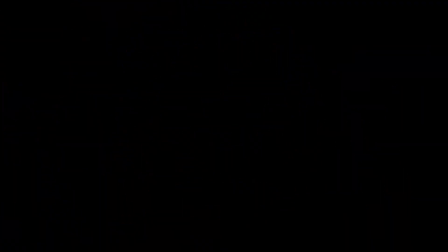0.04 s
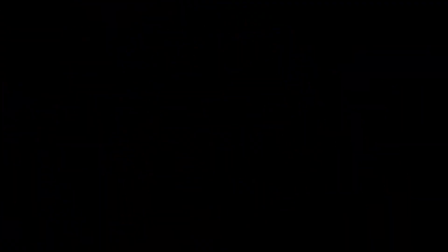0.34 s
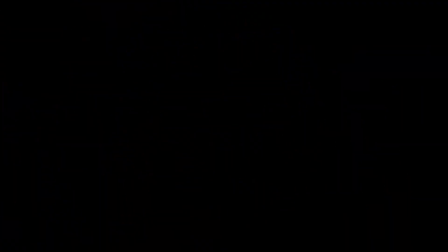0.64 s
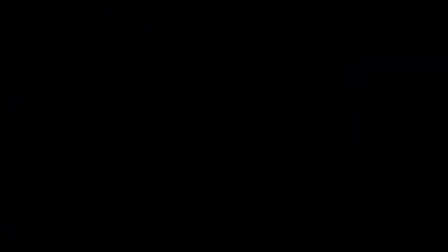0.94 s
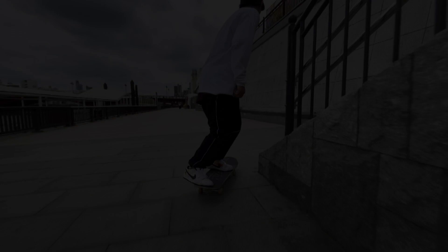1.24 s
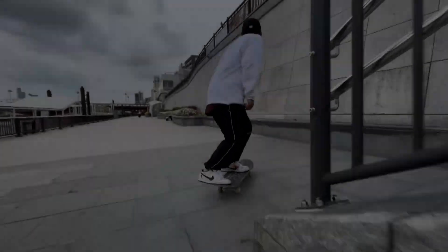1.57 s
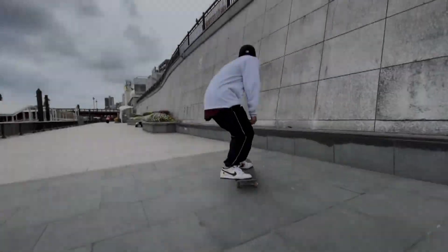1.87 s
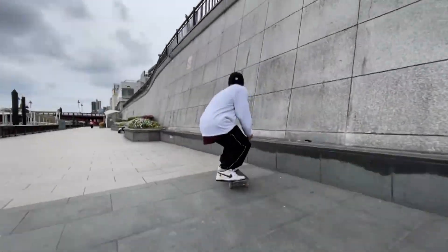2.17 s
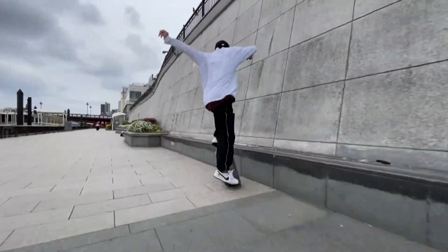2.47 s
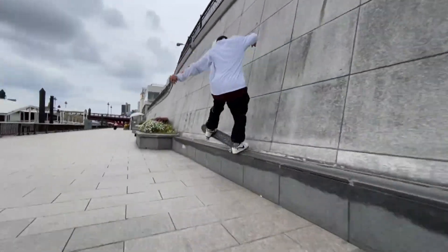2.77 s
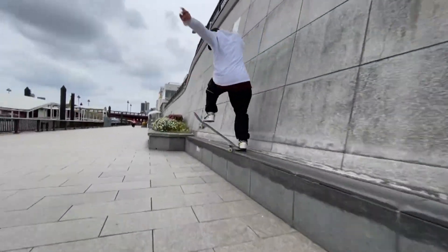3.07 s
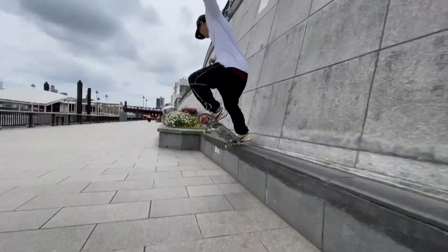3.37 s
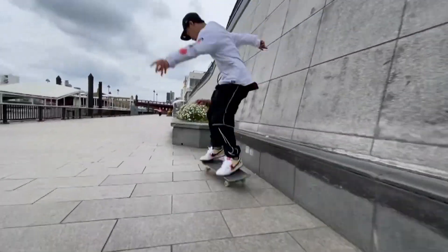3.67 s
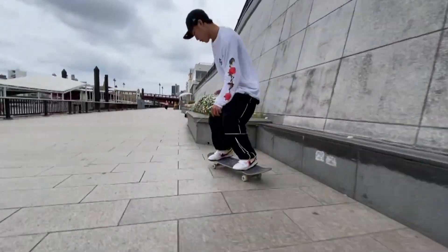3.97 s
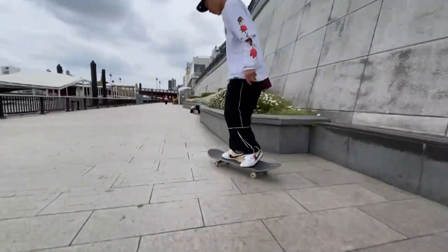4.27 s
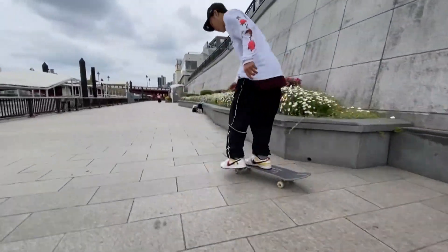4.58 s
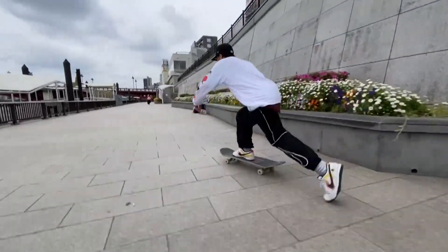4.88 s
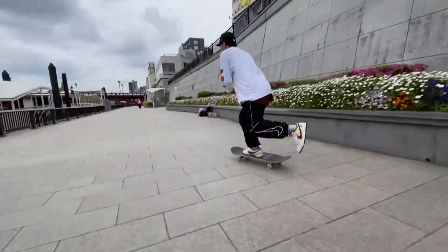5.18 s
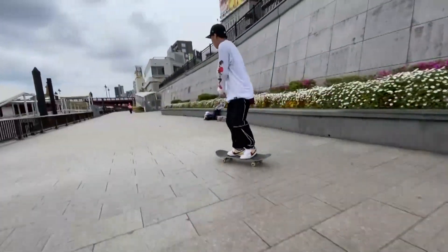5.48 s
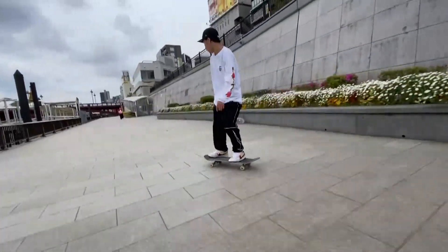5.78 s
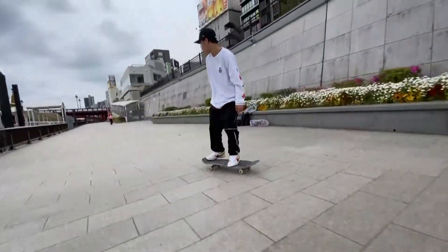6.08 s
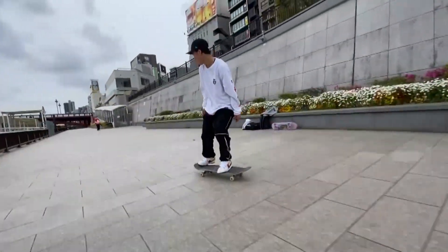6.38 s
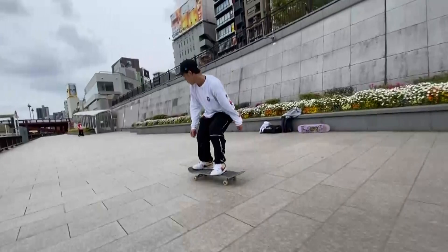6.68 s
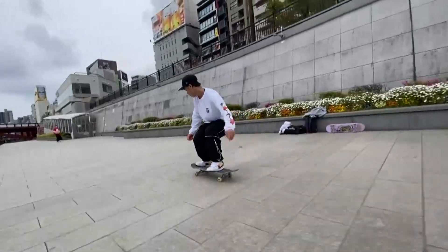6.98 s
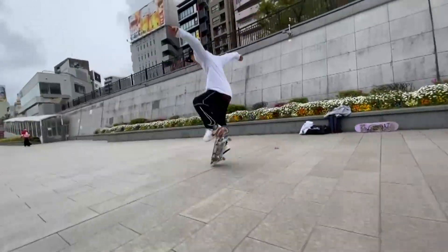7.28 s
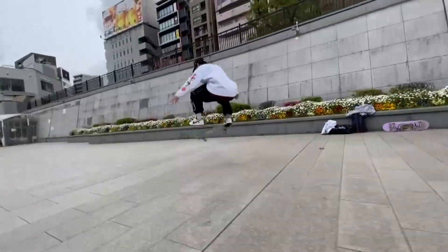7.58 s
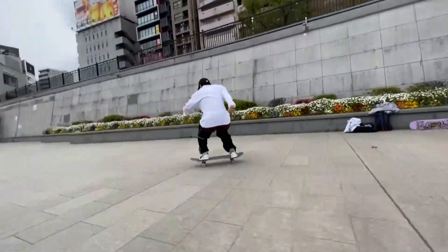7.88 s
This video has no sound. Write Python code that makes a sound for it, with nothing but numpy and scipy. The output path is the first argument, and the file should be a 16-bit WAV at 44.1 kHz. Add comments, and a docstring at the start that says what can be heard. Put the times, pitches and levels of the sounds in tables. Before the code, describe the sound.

Hard skateboard wheels roar over stone paving; a board pops onto a ledge, scrapes along it, lands, then snaps through a flip trick.

```python
"""A roar of hard wheels on gritty stone paving fades in from silence, with knocks at the slab joints.
Two skateboards roll beside a high wall, one right under the microphone, one just ahead. The rider
ahead pops onto a stone ledge, scrapes along it, lands, pushes off, then pops and lands a flip trick.
Blows ring the wooden decks and metal trucks; paving and wall reflect; a gust buffets the microphone."""
import sys
import numpy as np
from scipy import signal
from scipy.fft import rfft, irfft, next_fast_len
from scipy.io import wavfile
from scipy.ndimage import uniform_filter1d

SR = 44100
rng = np.random.default_rng(int(sys.argv[2]) if len(sys.argv) > 2 else 0)


def transcribe(signal):
    """Save signal, clipped to [-1, 1], as a 16-bit WAV file at the path in sys.argv[1]."""
    frames = np.atleast_2d(signal).T
    limited = np.clip(frames, -1, 1)
    pcm = np.round(limited * 32767).astype(np.int16)
    wavfile.write(sys.argv[1], SR, pcm)


N = 354123
TIME = np.arange(N) / SR
HIT_TIME = TIME[:8192]
FADE_START_S = 0.725

# wheel hiss spectrum: freq_hz, level_db
HISS_SPECTRUM = [(1500, -18), (3200, -1), (5000, 6.5), (7000, -2), (10000, 3.5), (15000, -12.5)]
# spectrum of a wheel on a slab edge: freq_hz, level_db
TICK_SPECTRUM = [(500, -36), (1300, -12), (2200, -8), (3000, 3), (4500, 3.5), (6500, -5.5), (10000, -15),
                 (15000, -73)]


def rolling(jolt_db=1.62, jolt_hz=24.5):
    """Stone texture and grit shake wheels and deck; the same bumps sound in every register."""
    # register spectra: freq_hz, level_db
    rumble_spectrum = [(20, -6), (45, -8), (70, -9), (110, -11), (150, 2), (205, -1), (280, 2), (380, 1),
                       (520, -20), (900, -37.5)]
    roar_spectrum = [(250, -15), (380, -4.5), (500, 0.5), (620, 0), (780, -1), (950, -2.5), (1300, -20.5),
                     (2000, -37.5), (5000, -48)]
    clatter_spectrum = [(500, -28), (800, 1.5), (1020, 3), (1200, 0.5), (1450, 0), (1650, -5.5),
                        (2000, -12), (3000, -24), (6000, -62.5)]
    grit_spectrum = [(900, -30), (1400, -5), (1700, 6.5), (2000, 0), (2300, -4.5), (2700, -11),
                     (3500, -15.5), (4800, -13), (8000, -23)]
    # wheel howl, shifting with the stone: time_s, pitch_hz, over_roar_db
    howl_curve = [(2.2, 660, -12), (2.7, 538, -9), (3.45, 534, -6), (4.05, 534, -6.5), (4.25, 693, -1),
                  (5.0, 700, -2), (5.8, 760, -5.5), (6.25, 670, -5), (6.48, 577, -3), (6.66, 587, 4.5),
                  (6.8, 574, 2.5), (6.97, 680, 2), (7.3, 680, 1.5)]
    time_s, howl_hz, howl_db = np.transpose(howl_curve)
    bumps = grains(per_s=700, spread_db=5)
    sand = grains(per_s=250, spread_db=-1)   # crushed under the wheels
    texture = rng.standard_normal((5, N))
    rumble = rms_one(colour(texture[0] + 0.48 * bumps, rumble_spectrum))
    roar = rms_one(colour(texture[1] + 0.49 * bumps, roar_spectrum))
    howl_drive = colour(rng.standard_normal(N), roar_spectrum)
    howl = rms_one(resonance(howl_drive, np.interp(TIME, time_s, howl_hz), width_hz=63))
    howl *= from_db(np.interp(TIME, time_s, howl_db))
    deck_drive = rng.standard_normal(N)
    hollow_mode = deck_ring(centre_hz=528, focus_db=12, damping=1.2, vary_db=1.5)
    hollow = rms_one(signal.fftconvolve(deck_drive, hollow_mode)[:N])
    clatter = rms_one(colour(texture[2] + 0.83 * bumps, clatter_spectrum))
    grit = rms_one(colour(texture[3] + 0.91 * bumps + 1.27 * sand, grit_spectrum))
    hiss = rms_one(colour(texture[4] + 1.77 * puffs(bumps, decay_s=0.0018), HISS_SPECTRUM))
    wheels = (from_db(-0.5) * wheel_gain("rumble") * rumble
              + from_db(1) * wheel_gain("roar") * (roar + howl + from_db(-7) * hollow)
              + from_db(1.5) * wheel_gain("clatter") * clatter
              + wheel_gain("grit") * grit)
    jolts = from_db(jolt_db * wander(jolt_hz))   # uneven stone
    return jolts * wheels + from_db(5.5) * hiss_gain() * hiss


def wheel_gain(register, usual_roll_db=-30):
    """Gain of one rolling register, set by speed, load and coarseness of the paving."""
    # roll strength from speed and load: time_s, level_db
    roll_curve = [(1.0, -30), (1.95, -28), (2.25, -26.5), (2.74, -29), (2.88, -30), (3.15, -30.5),
                  (3.47, -27), (3.7, -27.5), (3.87, -35), (4, -30), (4.13, -28.5), (4.35, -37),
                  (4.62, -39.5), (4.79, -33), (4.96, -24.5), (5.07, -30), (5.55, -33), (5.88, -25),
                  (6.23, -27.5), (6.58, -26.5), (7.55, -31), (7.75, -28), (7.87, -37), (8.03, -33)]
    # paving coarseness: time_s, over_ordinary_db
    coarseness_curve = [(1.4, 2), (2.1, -4.5), (2.45, 1), (2.7, -3.5), (3.42, 4), (3.8, 3.5), (4.15, -3),
                        (4.4, -3.5), (4.6, -2), (4.88, 8), (5.1, 1), (5.5, 0.5), (5.75, 9.5), (6.049, 0.5),
                        (6.45, 1.5), (6.95, 1.5), (7.55, 4), (8, 0.5)]
    # response by register: usual_db, db_per_roll_db, db_per_coarse_db
    responses = {"roar": (-30.5, 0.99, -0.017), "rumble": (-36, 0.66, -0.19),
                 "clatter": (-33.5, 0.76, 0.61), "grit": (-42, 0.84, 0.92), "hiss": (-53, 0.46, 0.23)}
    usual_db, per_roll, per_coarse = responses[register]
    roll_db = np.interp(TIME, *np.transpose(roll_curve))
    coarse_db = np.interp(TIME, *np.transpose(coarseness_curve))
    return from_db(usual_db + per_roll * (roll_db - usual_roll_db) + per_coarse * coarse_db)


def hiss_gain():
    """Rolling hiss and scuffs, summed in power."""
    # wheels and soles scuffing sideways: centre_s, sigma_s, level_db
    scuffs = [(2.44, 0.027, -46), (4.2, 0.064, -51.5), (4.84, 0.18, -47), (5.4, 0.15, -51.5),
              (5.83, 0.05, -51), (7.1, 1, -50.5)]
    return np.hypot(wheel_gain("hiss"), swells(scuffs))


def joints(small_per_s=9):
    """Woody knocks, mostly wheels on slab joints; lesser ones at uneven steps scale with the roar."""
    # loudest woody knocks (slab joints, loose trucks, the pop and the ledge hit):
    # start_s, thud_hz, thud_db, clack_db, snap_db, tick_db
    knocks = [(0.7558, 640, -8, -13, -35, -32), (0.8768, 620, -6, -12, -36.5, -28),
              (1.0028, 750, -27, -18, -24, -42.0), (1.022, 690, -16, -13, -36, -41),
              (1.0537, 640, -22, -13, -24, -46), (1.1583, 700, -14, -5, -35, -21),
              (1.1656, 740, -24, -11, -33, -22.5), (1.2824, 770, -11, -11, -28, -31),
              (1.2898, 660, -21, -9.5, -32, -36), (1.3827, 660, -27.5, -19, -26, -31),
              (1.4055, 650, -14, -16, -38, -44), (1.4163, 640, -15, -15, -39, -33),
              (1.493, 543, -14, -28, -19.5, -26.5), (1.538, 650, -15.5, -11, -23, -25),
              (1.6684, 604, -9, -5.5, -35, -40), (1.6757, 680, -14, -25, -35, -27.5),
              (1.799, 676, -17, -20, -44, -35), (1.8125, 610, -11, -15, -38, -29),
              (1.9367, 610, -15.5, -13, -44, -36), (2.0694, 724, -8.5, -17, -38, -48),
              (2.0783, 680, -13, -14, -41.5, -43), (2.1002, 664, -15, -10, -37, -29.0),
              (2.2141, 600, -10.5, -10, -40, -47.5), (2.228, 710, -10, -8, -34, -24.5),
              (2.2367, 552, -20, -12, -39, -39.0), (2.2532, 775, -5, -15, -26, -28),
              (2.261, 636, -10.5, -30, -42.0, -47.5), (2.366, 945, -6.5, -8, -32, -25),
              (2.3715, 1000, -8, -14, -38, -33), (2.385, 800, -4, -9, -29, -21.5),
              (2.3918, 640, -12, -22, -39.5, -41), (2.524, 795, -13.5, -26, -43.5, -55.0),
              (2.5655, 560, -17, -10, -14, -15), (2.7543, 620, -14, -16, -34, -36),
              (2.7603, 567, -10.5, -27, -46.0, -47), (2.805, 580, -31, -35, -23, -9.5),
              (2.9163, 606, -18, -19.0, -50.0, -54.0), (3.0635, 546, -15, -20, -44, -42),
              (3.075, 530, -14.5, -23, -42, -46), (3.2923, 640, -12.5, -23, -28, -38),
              (3.3709, 716, -5.5, -17, -25, -37), (3.3774, 566, -9.0, -13, -23, -39),
              (3.4165, 800, -23.5, -19, -25, -33), (3.4316, 560, -9, -13, -20, -31),
              (3.4817, 510, -10, -30, -40.0, -43.0), (3.487, 583, -8, -20, -30, -29),
              (3.5333, 600, -13.5, -21, -36.5, -39), (3.5835, 760, -8, -20, -37, -46),
              (3.5894, 573, -2.5, -4.5, -12, -20.5), (3.5971, 574, -8.5, -5, -29, -46),
              (3.6357, 780, -4.5, -12, -35.5, -27), (3.6807, 596, -10, -25, -50.5, -48.5),
              (3.795, 770, -13.5, -15, -39.5, -43.5), (3.935, 554, -15, -21, -34, -30),
              (3.847, 560, -16, -28, -44, -50), (4.0195, 545, -22, -26, -44, -40),
              (4.0924, 650, -11.5, -15.5, -34, -34), (4.1201, 661, -21, -26, -42, -48),
              (4.176, 630, -18, -22, -40, -37), (4.2142, 640, -18, -24, -34, -34),
              (4.675, 760, -21, -40, -44, -52), (4.8775, 820, -27, -20, -22, -38),
              (4.9844, 700, -16, -23, -29.5, -30), (5.302, 700, -15, -23, -42, -44),
              (5.507, 700, -26, -27, -38, -46), (5.5896, 704, -18, -21, -37, -41),
              (5.616, 720, -16, -21, -32, -39), (5.6383, 696, -21, -12.5, -38, -29),
              (5.6736, 710, -26, -16, -32.5, -34), (5.708, 654, -12.5, -13, -19, -24.5),
              (5.7536, 705, -14, -13, -37.0, -43.0), (5.761, 840, -25, -14, -23, -31.5),
              (5.786, 700, -24, -16, -29, -40), (5.827, 695, -19, -28, -26, -43),
              (5.899, 710, -10, -13, -19, -40.5), (5.9177, 620, -12, -26, -37, -42),
              (5.936, 690, -25, -12, -15, -29), (5.9959, 710, -14.5, -13, -14, -24.5),
              (6.038, 724, -11, -26, -32, -38), (6.0585, 784, -20, -21.0, -27, -43),
              (6.133, 700, -14, -21, -40, -48), (6.173, 704, -18, -18, -33, -46),
              (6.211, 810, -11, -10, -39, -43.5), (6.2966, 760, -12.5, -19, -25, -32),
              (6.314, 715, -14, -17, -23, -37), (6.3294, 700, -16.5, -18, -24, -39),
              (6.359, 690, -13, -17, -30, -35), (6.4056, 640, -13.5, -20, -24, -44.5),
              (6.4134, 700, -22, -19, -24, -43), (6.428, 700, -13, -22, -25, -36),
              (6.4467, 590, -14, -11.5, -24, -26), (6.502, 570, -10.5, -12, -32, -32),
              (6.5415, 820, -9.5, -25, -19, -26), (6.6272, 530, -11.5, -31, -36, -26),
              (6.6454, 576, -20, -17, -32, -37.5), (6.6593, 610, -8.5, -10, -17, -24.5),
              (6.7298, 634, -22, -19, -27, -30), (6.752, 660, -13, -22, -34, -35),
              (6.761, 770, -27, -21, -20, -41), (6.794, 670, -16, -15, -22, -29),
              (6.8071, 690, -19, -11.5, -29, -24.5), (6.8379, 614, -16, -28, -27, -38),
              (6.8764, 570, -30, -21, -35, -31), (6.9166, 696, -16, -23, -34.0, -42.5),
              (7.0742, 660, -11.5, -26, -42, -47), (7.1055, 700, -31, -20, -30, -39),
              (7.119, 710, -22, -19, -33, -37), (7.1645, 730, -11, -23, -32, -33),
              (7.2399, 670, -19, -22, -36.5, -35), (7.3141, 570, -13, -17, -15, -27),
              (7.3562, 580, -18, -16, -41, -42), (7.4183, 704, -20, -16.5, -29, -47),
              (7.4597, 698, -19.5, -17.5, -41, -27), (7.4903, 666, -15.5, -24, -31, -37),
              (7.5318, 670, -6.5, -28, -34, -42), (7.6035, 716, -12, -12, -26, -27),
              (7.638, 695, -14, -12, -27, -40), (7.677, 690, -10, -14, -31.5, -26),
              (7.6894, 554, -16, -17, -33.0, -26), (7.7128, 720, -10, -23.0, -28.5, -39),
              (7.7519, 680, -15, -10.5, -29, -23), (7.861, 646, -16, -22, -42, -46),
              (7.897, 664, -18, -17, -38, -34), (7.973, 600, -13, -23, -41, -27.5),
              (8.0043, 670, -14, -14, -37, -35)]
    out, roar_gain = np.zeros(N), wheel_gain("roar")
    for start_s, *knock in knocks:
        add(out, start_s, joint_knock(*knock))
    step_s = 1 / small_per_s
    for slot_s in np.arange(FADE_START_S, TIME[-1] - step_s, step_s):
        start_s = slot_s + rng.random() * step_s
        gain = roar_gain[int(start_s * SR)] * from_db(rng.normal(0, 0.5))
        knock = joint_knock(rng.uniform(515, 980), thud_db=5.5, clack_db=0, snap_db=-24, tick_db=-17)
        add(out, start_s, gain * knock)
    return out


def joint_knock(thud_hz, thud_db, clack_db, snap_db, tick_db):
    """One touch: slab edge ticks, truck snaps, deck clacks, wheel thuds; the second wheel follows."""
    force = contact()
    thud = peak_one(butter(force, [thud_hz / 1.371, thud_hz * 1.371], "band", order=3))
    ring = peak_one(deck_ring(thud_hz, focus_db=8.5, damping=0.86, vary_db=4.5))
    clack = peak_one(butter(force, (1028, 1616), "band", order=3))
    snap = peak_one(butter(force, (1900, 2790), "band", order=3))
    tick = peak_one(colour(burst(decay_s=0.0027) * (1 - np.exp(-HIT_TIME / 0.0014)), TICK_SPECTRUM))
    knock = (from_db(thud_db) * (thud + from_db(-7.5) * ring) + from_db(clack_db) * clack
             + from_db(snap_db) * snap + from_db(tick_db + 2.5) * tick)
    lag_s = rng.uniform(0.00399, 0.009)
    second_wheel = np.pad(knock, (int(lag_s * SR), 0))[:len(knock)]
    return knock + from_db(-9.5) * second_wheel


def contact(decay_s=0.0006):
    """Force of one hard, gritty touch."""
    return burst(decay_s) * HIT_TIME + 1e-18


def slaps(attack_s=0.00057):
    """Wood meets stone: a dense crack or hissy scuff, a woody bark, the ring of deck and trucks."""
    # pops, landings, sharp clicks and hissy scuffs of the board on stone:
    # start_s, level_db, decay_s, wood_hz, highpass_hz, lowpass_hz
    touches = [(2.564, -11, 0.0052, 2620, 200, 6300), (2.58, -23.5, 0.026, 4500, 900, 7200),
               (2.609, -39, 0.0073, 6900, 4000, 9000), (2.8034, -18.5, 0.01, 2880, 150, 7650),
               (2.834, -21.5, 0.013, 3470, 300, 7000), (2.964, -23, 0.0051, 3420, 200, 8000),
               (3.191, -27, 0.057, 4100, 1500, 5530), (3.258, -27, 0.0027, 2980, 600, 9000),
               (3.3685, -31, 0.003, 4200, 1500, 7000), (3.4325, -24, 0.0021, 2970, 900, 7000),
               (4.089, -32, 0.0049, 6840, 4000, 12000), (3.7391, -10.5, 0.0065, 1510, 200, 10000),
               (3.748, -9.5, 0.0084, 1140, 200, 3220), (7.3123, -18, 0.005, 2150, 900, 5250),
               (7.7623, -18.5, 0.01, 1520, 600, 4550), (7.7692, -13.5, 0.0077, 1960, 550, 10700)]
    # contact noise spectrum: freq_hz, level_db
    slap_spectrum = [(60, -21), (170, -1), (300, 10), (500, 3.5), (800, 0.5), (1500, 1), (2700, -9.5),
                     (3500, -8), (4600, -5.5), (6500, -14), (10000, -9.5), (16000, -2)]
    out, attack = np.zeros(N), 1 - np.exp(-HIT_TIME / attack_s)
    for start_s, level_db, decay_s, wood_hz, highpass_hz, lowpass_hz in touches:
        force = attack * (np.exp(-HIT_TIME / decay_s) + 0.047 * np.exp(-HIT_TIME / 0.042))
        noise = colour(rng.standard_normal(len(HIT_TIME)) * force, slap_spectrum)
        bark = butter(noise, [wood_hz / 1.1, wood_hz * 1.22], "band", order=1)
        slap = butter(noise + 1.66 * bark, lowpass_hz, "low")
        slap = butter(slap, highpass_hz, "high", order=1)
        slap /= np.std(slap[HIT_TIME < 0.01])
        ring = deck_ring(wood_hz, focus_db=5, damping=1.2, vary_db=2)
        add(out, start_s, from_db(level_db) * (slap + 0.39 * ring + from_db(-3.5) * truck_ring()))
    return out


def deck_ring(centre_hz, focus_db, damping, vary_db):
    """One blow on the deck; modes weaken by focus_db per octave from centre_hz."""
    # modes of the deck with its trucks: freq_hz, level_db, t60_s
    deck_modes = [(151, 0.5, 0.15), (276, -11, 0.15), (413, -9.5, 0.04), (524.4, -3.5, 0.11),
                  (688, -4, 0.063), (897, -1, 0.072), (1089, 2.5, 0.055), (1160, 0, 0.026),
                  (1364, 2, 0.033), (1456, 6, 0.026), (1500, 5, 0.025), (1890, -21, 0.051),
                  (2247, -7.5, 0.051)]
    hz, db, t60_s = np.transpose(deck_modes)[:, :, None]
    hz = hz * (1 + 0.01 * rng.standard_normal(hz.shape))   # rider's weight shifts the modes
    focused_db = db - focus_db * np.abs(np.log2(hz / centre_hz))
    return ring_modes(hz, focused_db, t60_s / damping, vary_db)


def truck_ring():
    """The metal trucks ring after a hard slap."""
    # truck modes: freq_hz, level_db, t60_s
    truck_modes = [(2260, -4, 0.091), (2790, -10, 0.054), (3275, -16.5, 0.057), (3690, -33, 0.42),
                   (3840, -10, .06), (4520, -11, 0.038), (5010, -16, 0.086)]
    return ring_modes(*np.transpose(truck_modes)[:, :, None], vary_db=2)


def ledge_slide(attack_s=0.0092, release_s=0.044):
    """The board sticks and slips along the ledge in uneven clumps that set the stone ringing."""
    # sliding contacts: start_s, length_s, level_db
    slides = [(2.801, 0.048, -33), (2.936, 0.084, -43), (3.201, 0.062, -35.5), (3.358, 0.08, -35.5),
              (3.48, 0.025, -43)]
    # scrape spectrum: freq_hz, level_db
    scrape_spectrum = [(400, 6), (1000, 1), (2000, -3.5), (2800, -4), (3500, -6), (4500, -13), (5500, -18),
                       (8000, -10.5), (15000, -6)]
    # ledge resonances: freq_hz, width_hz, level_db
    ledge_modes = [(1160, 87, 4), (1390, 81, -3), (2160, 80, 3), (2400, 70, 3), (2710, 110, -0.5),
                   (3320, 200, -6), (4080, 150, -1), (4600, 150, -7), (4950, 170, 8)]
    envelope = np.zeros(N)
    for start_s, length_s, level_db in slides:
        attack = np.clip((TIME - start_s) / attack_s, 0, 1)
        release = np.exp(-np.maximum(TIME - start_s - length_s, 0) / release_s)
        envelope += from_db(level_db) * attack * release
    clumps = from_db(4 * wander(top_hz=130))
    slips = grains(per_s=500, spread_db=2) * clumps
    scrape = colour(puffs(slips, decay_s=0.0003), scrape_spectrum)
    rings = sum(from_db(db) * butter(scrape, [hz - width_hz / 2, hz + width_hz / 2], "band", order=1)
                for hz, width_hz, db in ledge_modes)
    return from_db(7.5) * envelope * rms_one(scrape + 2.6 * rings)


def flexes(thud_lag_s=0.00085):
    """The deck gives with a dry crack and a short ring; its slower bending wave arrives as a thud."""
    # feet shifting, pushing and popping: start_s, pitch_hz, crack_db, thud_db
    cracks = [(4.5050, 1680, -20, -19), (4.5135, 1900, -8.5, -16.5), (4.5348, 1690, -22, -28),
              (5.0106, 1620, -21, -26), (5.0176, 1780, -10, -18), (5.0250, 1900, -12.5, -13),
              (5.1422, 1720, -13.5, -19), (5.1496, 1670, -16, -30), (5.2392, 1660, -30, -23),
              (5.2465, 1820, -16, -27), (5.2542, 1890, -14.5, -9), (5.2620, 1860, -13, -13),
              (7.3124, 2070, -7, -16)]
    out, impulse = np.zeros(N), signal.unit_impulse(len(HIT_TIME)) + 1e-18
    thud = peak_one(butter(impulse, (520, 920), "band", order=3))
    for start_s, pitch_hz, crack_db, thud_db in cracks:
        crack = peak_one(butter(impulse, [pitch_hz / 1.39, pitch_hz * 1.39], "band", order=4))
        ring = peak_one(deck_ring(pitch_hz, focus_db=2.5, damping=2, vary_db=-4))
        add(out, start_s, from_db(crack_db) * (crack + from_db(-12.5) * ring))
        add(out, start_s + thud_lag_s, from_db(thud_db) * thud)
    return out


def rattles(count=200):
    """Small dry truck clacks, each with a crumb of stone cracking; louder on rough ground."""
    out, grit_gain = np.zeros(N), wheel_gain("grit")
    for start_s in rng.uniform(FADE_START_S, TIME[-1], size=count):
        force = contact()
        band_hz = np.array([1100, 2150]) * rng.uniform(0.85, 1.15)
        clack = peak_one(butter(force, band_hz, "band", order=3))
        crumb = peak_one(colour(burst(decay_s=0.0056), TICK_SPECTRUM))
        gain = grit_gain[int(start_s * SR)] * from_db(rng.normal(11.5, 4))
        add(out, start_s, gain * (clack + 0.25 * crumb))
    return out


def drones():
    """The wheels drone in brief low swells, each an unsteady tone."""
    # drone swells: centre_s, sigma_s, pitch_hz, level_db
    tones = [(2.02, 0.027, 152, -26), (2.093, 0.015, 134, -19.5), (2.215, 0.011, 130.8, -28),
             (2.55, 0.043, 151, -30), (3.492, 0.02, 170.4, -29), (4.138, 0.064, 242, -33.5),
             (4.625, 0.045, 133.6, -36), (5.317, 0.067, 159.5, -33), (5.603, 0.07, 144.3, -36)]
    out = np.zeros(N)
    for centre_s, sigma_s, pitch_hz, level_db in tones:
        hz = pitch_hz * (1 + 0.0894 * wander(top_hz=33.2))
        out += swells([(centre_s, sigma_s, level_db)]) * np.sin(2 * np.pi * np.cumsum(hz) / SR)
    return out


def reflections(x, delay_s, decay_s):
    """A short spray of reflections off stone, different on each side."""
    age_s = HIT_TIME - delay_s
    spray = rng.standard_normal((2, len(age_s))) * (age_s > 0) * np.exp(-np.abs(age_s) / decay_s)
    spray /= np.sqrt(np.sum(spray ** 2, axis=1, keepdims=True))
    return signal.fftconvolve(x[None], spray, axes=1)[:, :N]


def far_hiss():
    """Wheel hiss returns off the stone from all sides."""
    treble = butter(rng.standard_normal((2, N)), 5000, "high")
    return from_db(-3) * hiss_gain() * rms_one(colour(treble, HISS_SPECTRUM))


def wind():
    """A gust rumbles on each microphone port separately."""
    # gust swells: centre_s, sigma_s, level_db
    gusts = [(4.87, 0.032, -43), (5.03, 0.032, -37), (5.2, 0.56, -46.5), (5.49, 0.017, -48)]
    # buffeting spectrum: freq_hz, level_db
    buffet_spectrum = [(15, -21), (45, 10.5), (75, 8.5), (130, -5), (300, -26)]
    return from_db(5) * swells(gusts) * rms_one(colour(rng.standard_normal((2, N)), buffet_spectrum))


def ring_modes(hz, db, t60_s, vary_db):
    """Decaying sines, each with random strength and sign."""
    envelopes = from_db(db + vary_db * rng.standard_normal(hz.shape) - 60 * HIT_TIME / t60_s)
    return np.sum(rng.choice([-1, 1], hz.shape) * envelopes * np.sin(2 * np.pi * hz * HIT_TIME), axis=0)


def grains(per_s, spread_db):
    """Random tiny impacts of uneven size; rms 1."""
    sizes = from_db(spread_db * np.minimum(rng.exponential(1, N), 4))
    return rms_one(sizes * rng.choice([-1, 1], N) * (rng.random(N) < per_s / SR))


def puffs(bumps, decay_s):
    """Each bump scuffs up a short puff of noise; rms 1."""
    energy = signal.lfilter([1], [1, -np.exp(-1 / (decay_s * SR))], bumps ** 2)
    return rms_one(np.sqrt(energy + 1e-9) * rng.standard_normal(N))


def burst(decay_s):
    """Decaying white noise."""
    return rng.standard_normal(len(HIT_TIME)) * np.exp(-HIT_TIME / decay_s)


def wander(top_hz):
    """Low-passed noise; rms 1."""
    return rms_one(butter(rng.standard_normal(N), top_hz, "low"))


def swells(rows):
    """Summed gain of bell-shaped swells."""
    return sum(from_db(db) * np.exp(-0.5 * ((TIME - centre_s) / sigma_s) ** 2)
               for centre_s, sigma_s, db in rows)


def resonance(x, hz, width_hz, block=128):
    """Resonator whose centre follows a curve, block by block."""
    out, state = np.zeros(N), np.zeros(2)
    radius = np.exp(-np.pi * width_hz / SR)
    zeros = [1 - radius, 0, radius - 1]
    for i in range(0, N, block):
        poles = [1, -2 * radius * np.cos(2 * np.pi * hz[i] / SR), radius * radius]
        out[i:i + block], state = signal.lfilter(zeros, poles, x[i:i + block], zi=state)
    return out


def colour(x, spectrum, power=1):
    """Minimum-phase filter through (freq_hz, level_db) points; power scales the dB."""
    count = x.shape[-1]
    size = 2 * next_fast_len(count // 2 + 2048)
    hz, db = np.transpose(spectrum)
    bin_hz = np.arange(size // 2 + 1) * SR / size
    gain = from_db(power * np.interp(np.log(bin_hz + 1), np.log(hz), db))
    cepstrum = irfft(np.log(gain))
    cepstrum[1:size // 2] *= 2
    cepstrum[size // 2 + 1:] = 0
    return irfft(rfft(x, size) * np.exp(rfft(cepstrum)))[..., :count]


def butter(x, hz, kind, order=2):
    """Butterworth filter."""
    sections = signal.butter(order, np.clip(hz, 10, 0.45 * SR), kind, fs=SR, output="sos")
    return signal.sosfilt(sections, x)


def add(track, start_s, sound):
    """Mix a short sound into a track."""
    start = int(start_s * SR)
    track[start:start + len(sound)] += sound[:N - start]


def from_db(db):
    """Decibels to gain."""
    return 10 ** (np.asarray(db) / 20)


def rms_one(x):
    """Scale to unit rms."""
    return x / np.sqrt(np.mean(x ** 2) + 1e-20)


def peak_one(x):
    """Scale to unit peak."""
    return x / np.abs(x).max()


def limiter(x, limit_db=-11.5, recovery_db_per_s=12.5, window_s=0.0055):
    """Gain drops at once when the louder side passes the limit, then creeps back."""
    size = int(window_s * SR)
    power = uniform_filter1d(np.max(x ** 2, axis=0), size)
    excess_db = np.maximum(10 * np.log10(np.abs(power) + 1e-12) - limit_db, 0)
    recovered_db = recovery_db_per_s * TIME
    duck_db = np.maximum.accumulate(excess_db + recovered_db) - recovered_db
    return x * from_db(-uniform_filter1d(duck_db, size // 2))


def scene():
    """Both boards, near reflections off the paving, later ones off the wall, and wind; stereo."""
    # share scattered by the paving: freq_hz, level_db
    scatter_spectrum = [(60, -8), (200, -14), (1400, -15), (3000, -11), (7000, -6), (14000, -5)]
    # channel balance: freq_hz, left_over_right_db
    balance = [(60, 5), (200, 9.5), (700, 8.5), (1300, 7), (2400, 5), (4400, 1.5), (7000, 0.5),
               (9500, 11.5), (12000, 9), (14000, -3)]
    tricks = slaps() + ledge_slide()
    boards = rolling() + joints() + flexes() + rattles() + drones() + tricks
    paving = reflections(colour(boards, scatter_spectrum), delay_s=0.001, decay_s=0.016)
    wall = from_db(-27) * reflections(tricks, delay_s=0.0054, decay_s=0.041)
    left, right = from_db(-2) * (boards + paving + wall + far_hiss())
    return np.array([colour(left, balance, power=0.49), colour(right, balance, power=-0.51)]) + wind()


def record(dry):
    """Treble ripple of the housing, bass cut, limiter, rounded peaks, fade-in, steep top cut."""
    # microphone housing response: freq_hz, gain_db
    housing_response = [(3000, -0.5), (4900, -6), (5400, -10.5), (5750, -4), (6150, -8), (6400, 0),
                        (7200, -2), (7750, -8), (8300, -5.5), (9900, -7), (11500, -9), (13300, -15.5),
                        (14700, -13), (16000, -31)]
    highpass_hz, lowpass_hz, ceiling, fade_s = 55, 15700, 0.8, 1.77
    filtered = butter(colour(dry, housing_response), highpass_hz, "high", order=3)
    rounded = ceiling * np.tanh(limiter(filtered) / ceiling)
    fade = np.clip((TIME - FADE_START_S) / fade_s, 0, 1) ** 0.86
    return signal.sosfilt(signal.ellip(10, 0.1, 90, lowpass_hz, fs=SR, output="sos"), rounded * fade)


dry = scene()
out = record(dry)
transcribe(out)
```